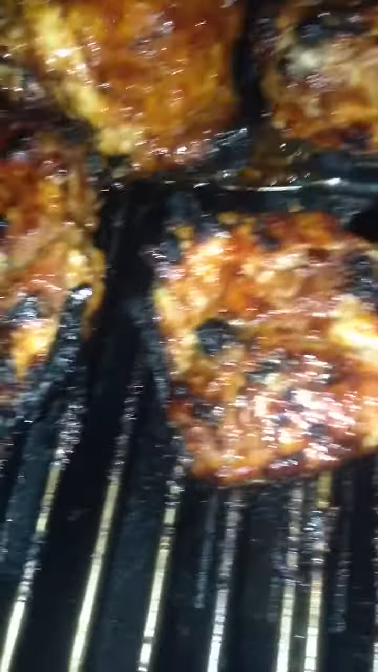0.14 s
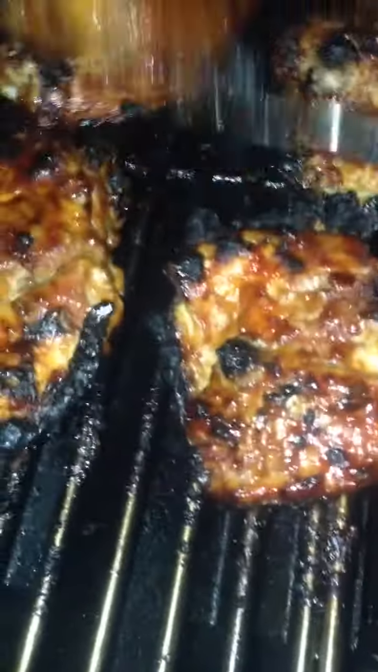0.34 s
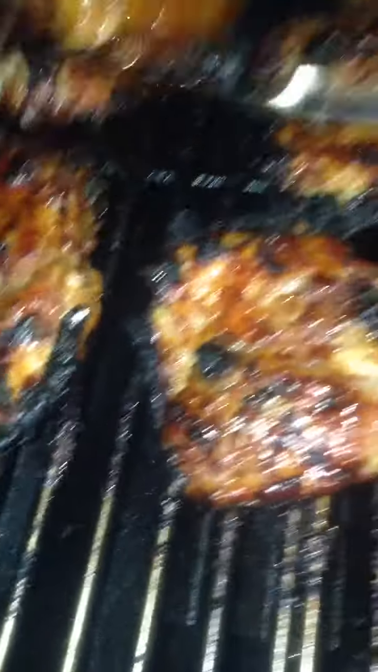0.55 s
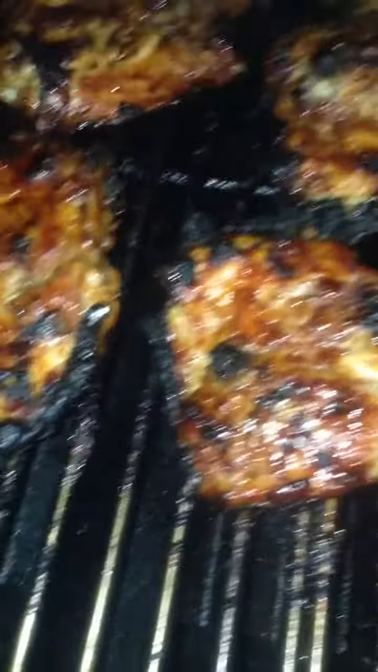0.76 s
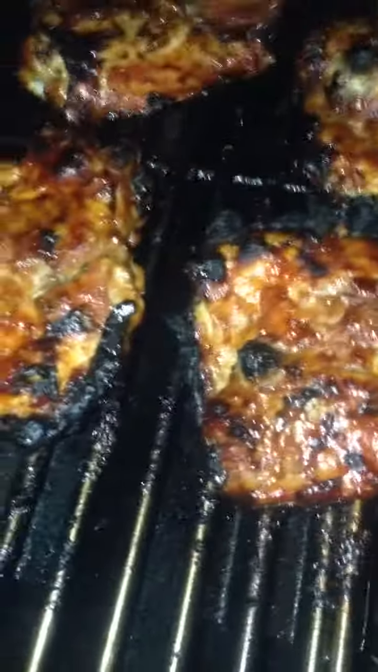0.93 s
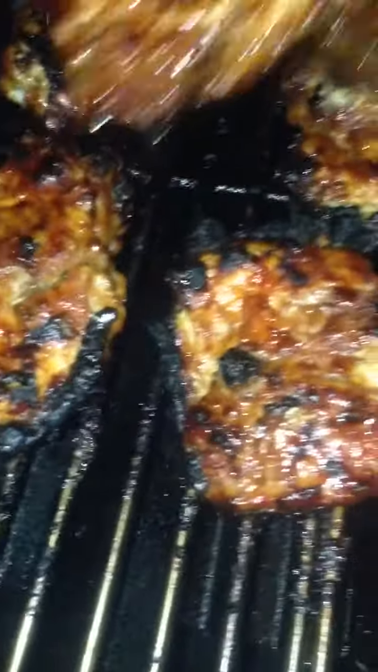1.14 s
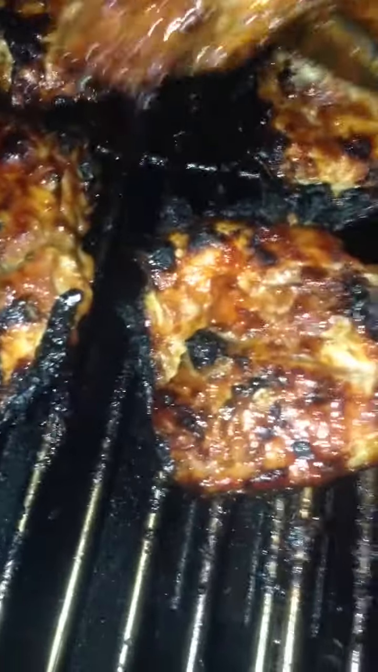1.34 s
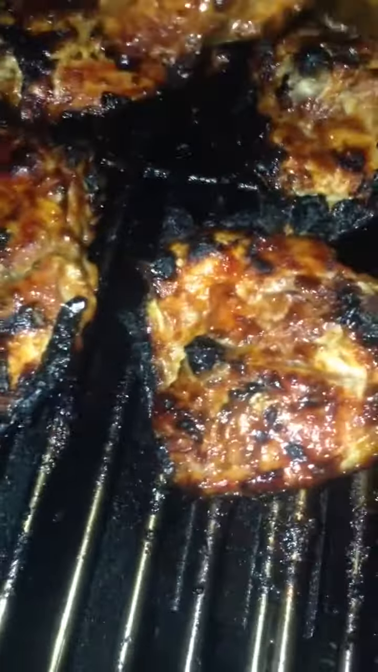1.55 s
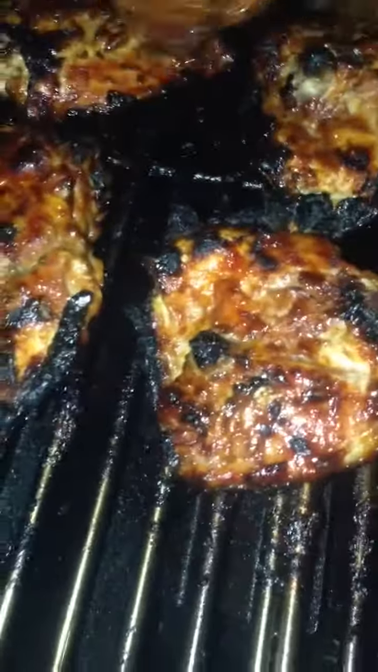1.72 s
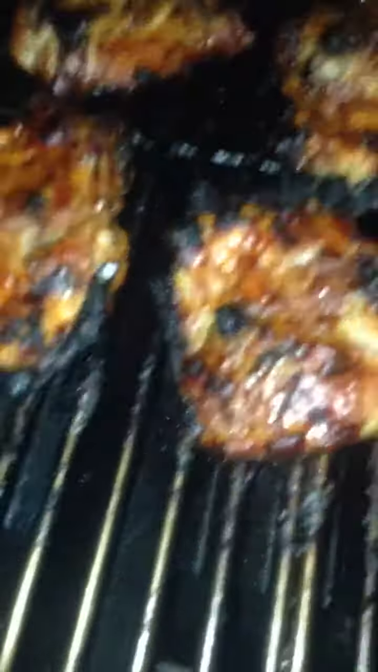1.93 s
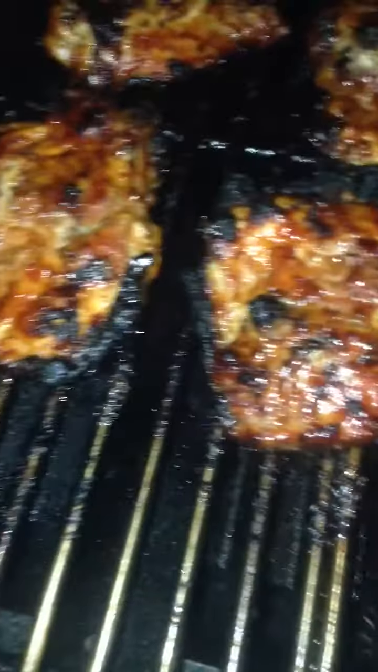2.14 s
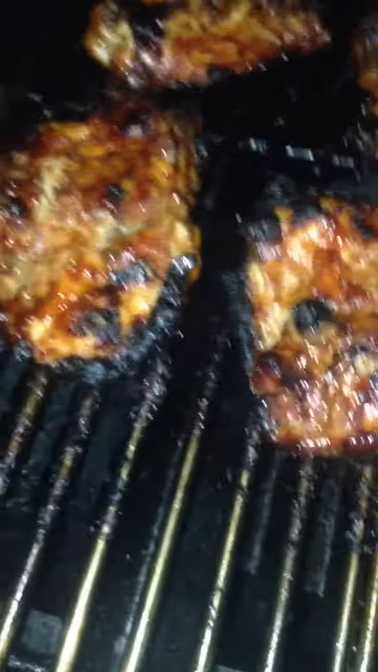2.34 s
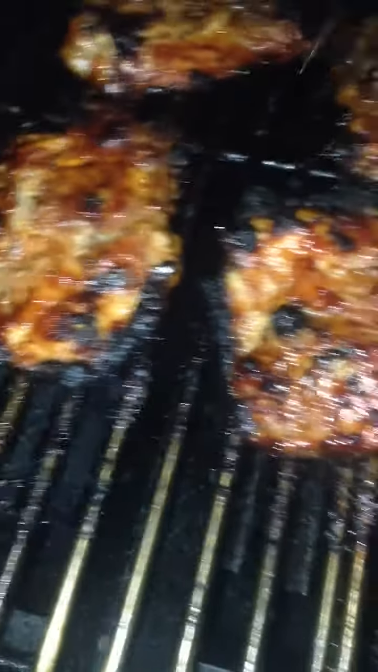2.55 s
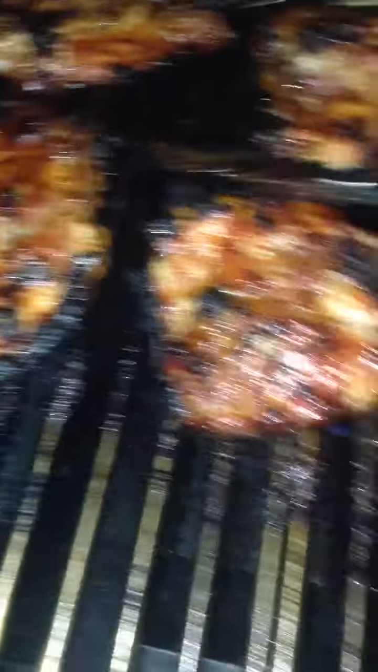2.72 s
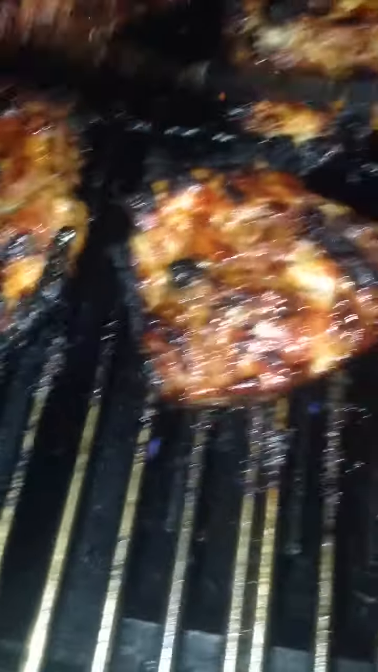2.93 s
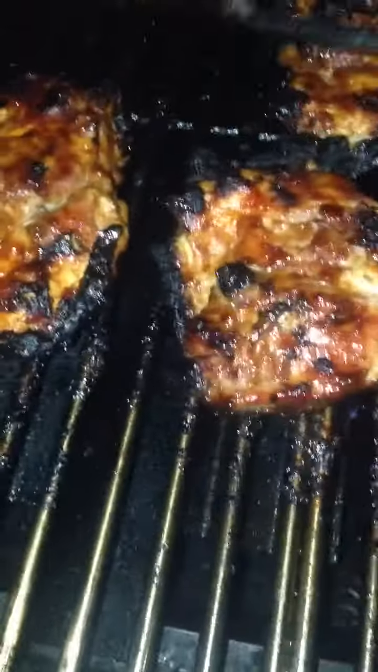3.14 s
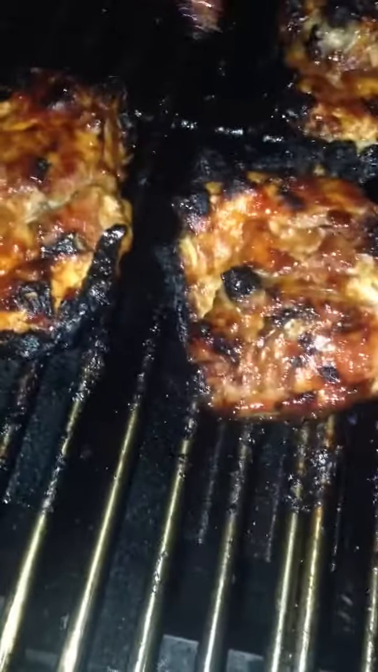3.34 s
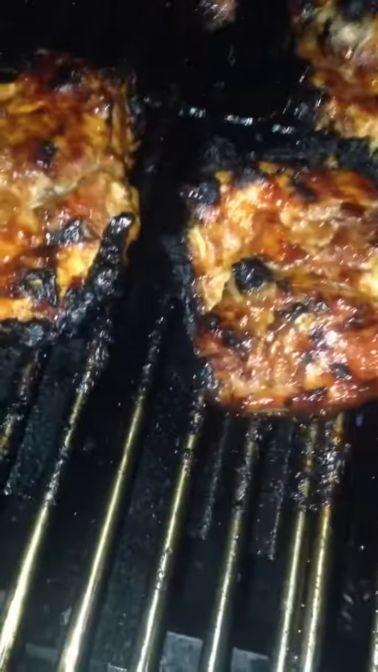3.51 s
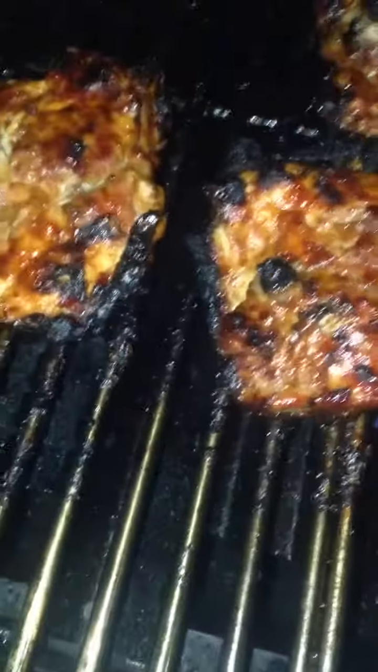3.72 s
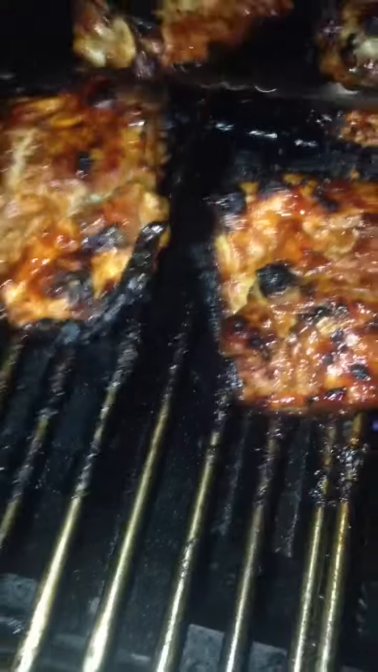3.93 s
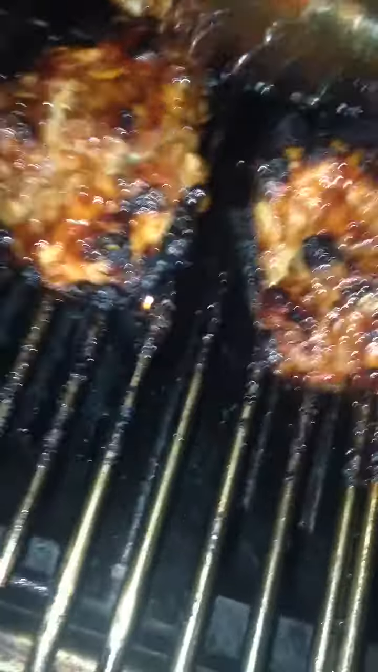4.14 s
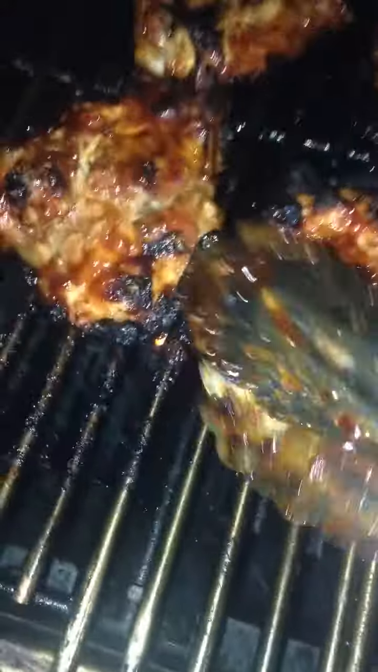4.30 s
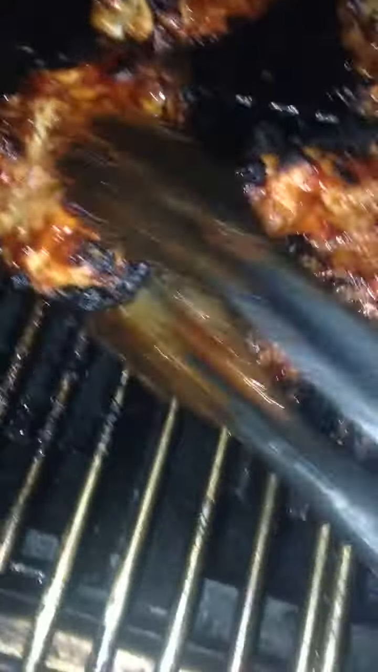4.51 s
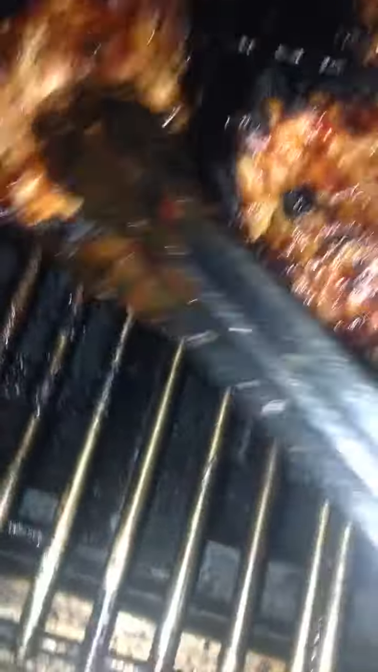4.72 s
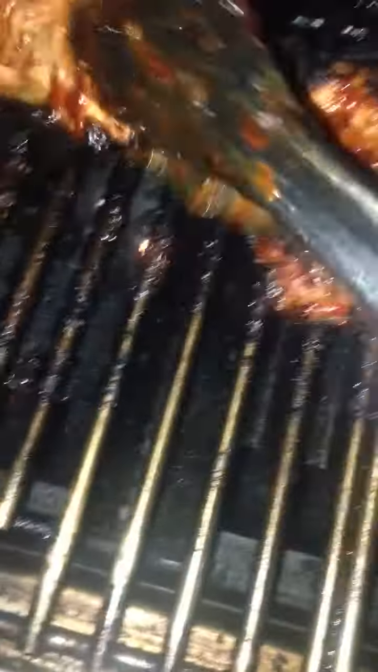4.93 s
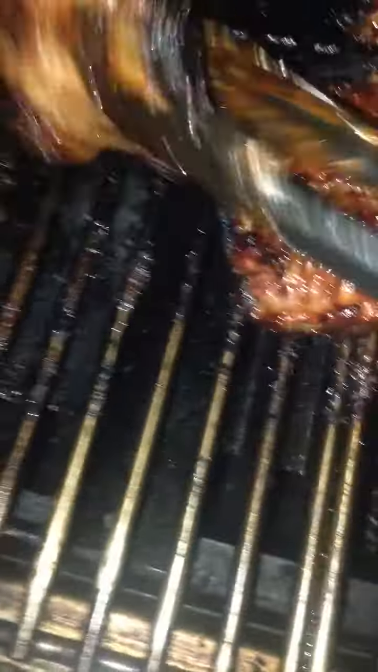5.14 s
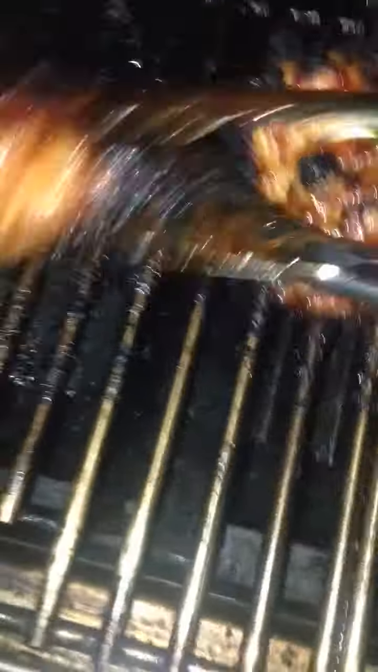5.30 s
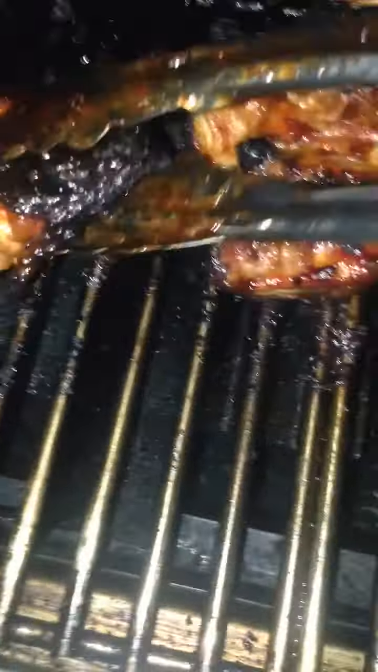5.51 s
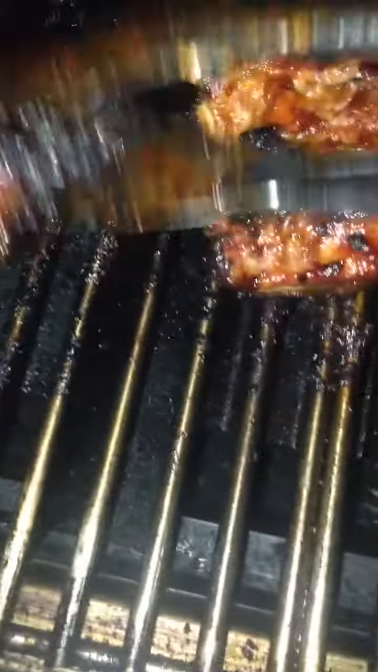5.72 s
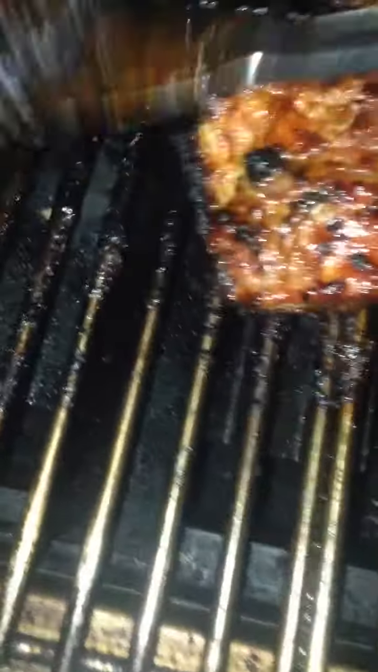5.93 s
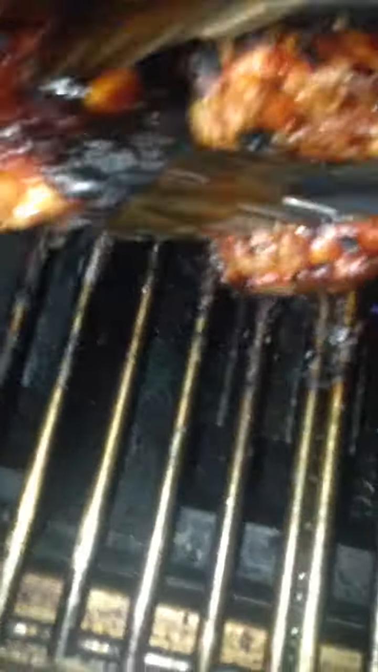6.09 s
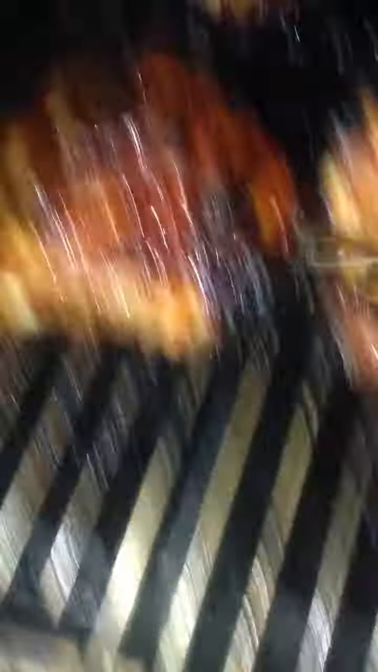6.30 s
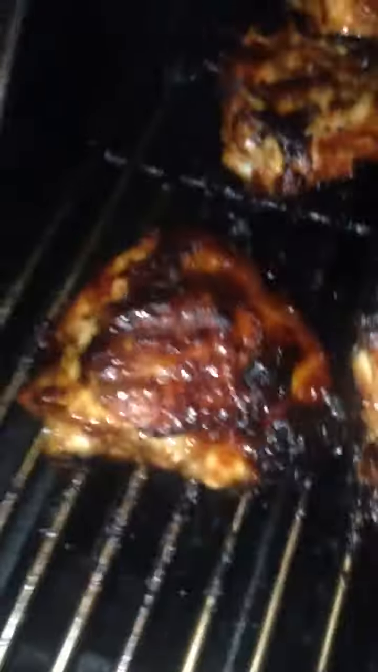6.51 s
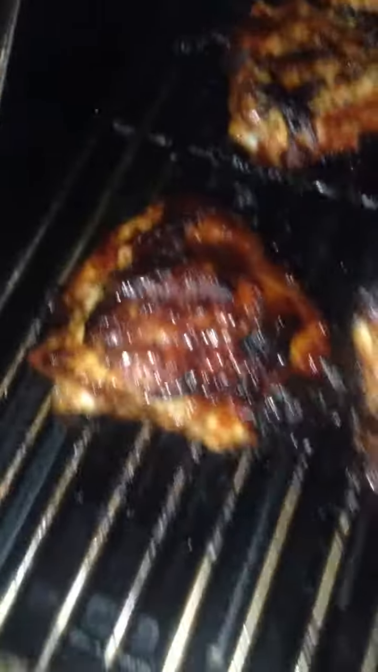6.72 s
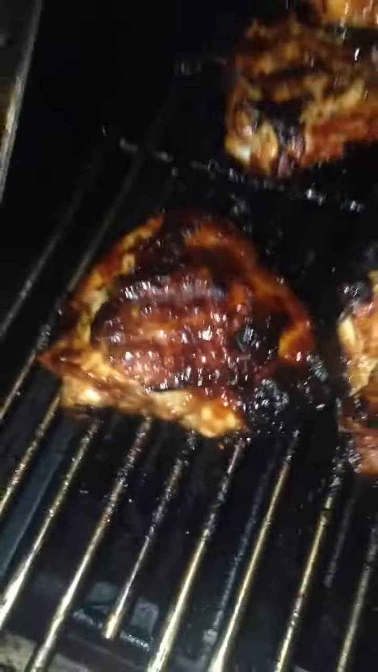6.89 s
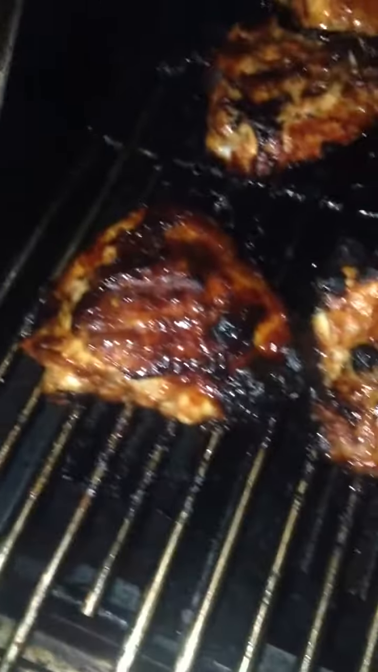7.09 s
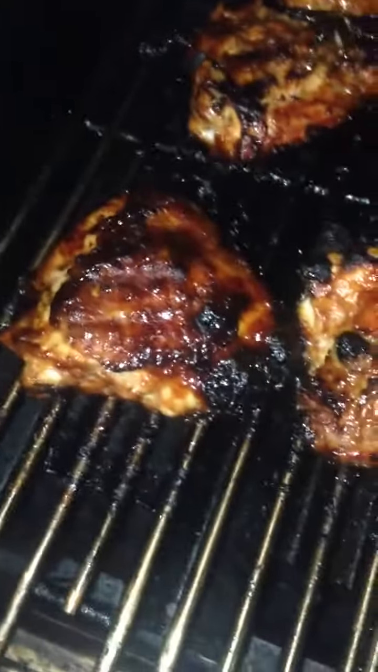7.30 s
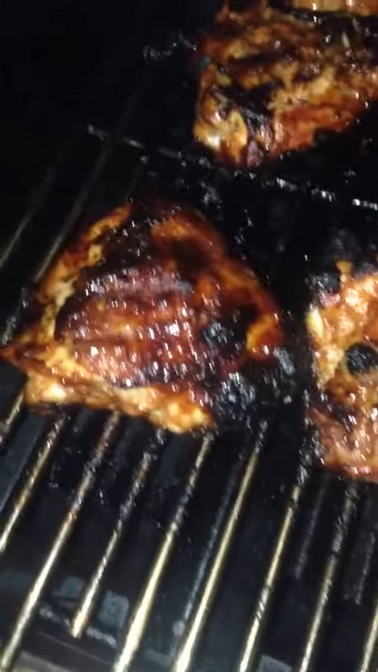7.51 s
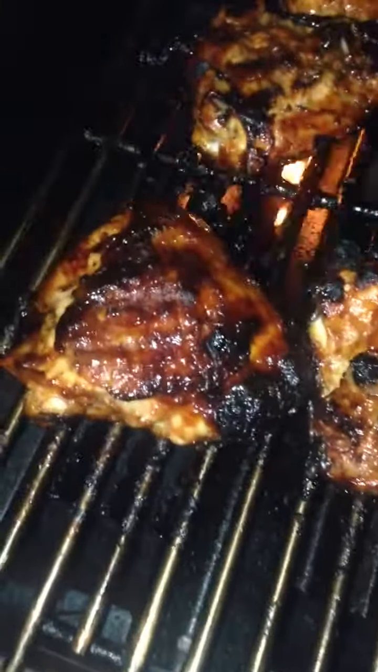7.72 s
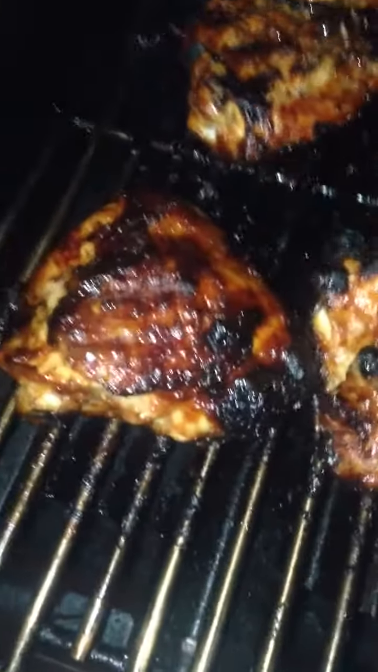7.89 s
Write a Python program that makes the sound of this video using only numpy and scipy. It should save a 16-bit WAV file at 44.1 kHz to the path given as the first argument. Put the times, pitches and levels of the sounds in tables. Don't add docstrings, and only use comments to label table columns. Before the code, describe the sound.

Sauced chicken sizzles on a hot grate, heard very close in mono by a phone with slightly limited treble. A steady steam hiss full of fine crackle opens loud and bright, with sharp pops in the first quarter second. It dips, then brightens suddenly near 0.85 s, just after a brief, rising low moan of flaring fat. From 1.3 s the sizzle slowly weakens, still peppered with pops, ticks and duller juicy plops; tongs rattle faintly near 2.9 s and soft low knocks cluster at 3.3-3.7 s. It is quietest and dullest around 4.4 s, then brightens abruptly and builds, with bumps near 5 s and frequent spits. A short swell comes at 6.4 s. After easing, hiss surges at 7.6 s with the strongest pop and fluttering low flame puffs, then settles slightly. Soft scraping and bass flame roar run underneath.

```python
import sys
import numpy as np
from scipy import signal
from scipy.io import wavfile
from scipy.ndimage import uniform_filter1d

SR = 44100
rng = np.random.default_rng(int(sys.argv[2]) if len(sys.argv) > 2 else 0)


def transcribe(signal):
    frames = np.atleast_2d(signal).T
    limited = np.clip(frames, -1, 1)
    pcm = np.round(limited * 32767).astype(np.int16)
    wavfile.write(sys.argv[1], SR, pcm)


def amplitude_ratio(level_db):
    exponent = np.asarray(level_db, float) / 20
    return 10 ** exponent


N = 350595

# (time [s], level [dB], brightness [dB])
SIZZLE_OVER_TIME = [(0.0, -34, 3.5), (0.5, -38.5, 2), (0.69, -40.5, 1), (0.79, -39, -1), (0.86, -37, 7),
                    (1.1, -37, 4.5), (1.33, -40, 0), (2.17, -43, -0.5), (3.25, -45, -2), (4.4, -48, -3),
                    (4.5, -45, 4.5), (4.92, -41.5, 1), (6.1, -42, 1), (6.38, -38, 2), (6.58, -41, 0),
                    (7.4, -41, -2), (7.63, -35.5, 3.5), (7.95, -39, 2.5)]
# (frequency [Hz], level per Hz [dB])
SIZZLE_COLOUR = [(71, -54), (120, -18), (166, -8), (229, -8.5), (397, -3), (506, -13), (645, -6.5),
                 (987, -10.5), (1210, -3), (1850, -4), (2000, -1.5), (2770, -1.5), (3330, 0), (13700, -0.5),
                 (15200, -1)]
# (centre time [s], rise [dB])
JUICE_SEETHES = [(0.3, 1), (0.59, 2.5), (0.75, 1), (1.41, 1.5), (2.0, 0.5), (2.26, 3.5), (2.4, 2),
                 (2.72, 2.5), (2.88, 2.5), (3.06, 0), (3.76, 1.5), (4.23, 3), (4.61, 2.5), (4.79, -0.5),
                 (4.92, 1.5), (5.32, 2.5), (5.96, 2.5), (6.17, 3), (6.71, 2.5), (7.01, 0)]
# (time [s], flutter level [dB], roar level [dB])
FLAME_OVER_TIME = [(0.0, -65.5, -67), (0.55, -73, -59), (1.0, -65, -56.5), (2.28, -78, -56),
                   (2.75, -65.5, -59), (3.1, -75, -56), (3.52, -66, -67), (3.74, -73, -76),
                   (4.65, -72.5, -60), (5.2, -73, -62.5), (6.1, -68.5, -63.5), (6.6, -71.5, -61),
                   (7.26, -74, -52.5), (7.95, -68, -57)]
# (frequency [Hz], width [Hz], level [dB])
GRILL_HOLLOW = [
    (160, 36, 2),
    (300, 110, -3),
    (382, 67, -0.5),
]
# (time [s], pitch [Hz], level [dB])
FLARE_MOAN = [
    (0.715, 139, -61),
    (0.76, 158.7, -54),
    (0.82, 167, -51.5),
    (0.87, 180, -61),
]
# (centre time [s], peak [dB], pitch [Hz])
SOFT_KNOCKS = [(0.021, -43, 71.5), (0.171, -52, 77.6), (1.006, -44, 427), (2.877, -44, 183),
               (2.917, -48, 147), (3.324, -54, 70), (3.401, -51, 59), (3.445, -40.5, 129), (3.482, -51, 93),
               (3.546, -50, 59), (3.589, -48, 146), (3.63, -43, 173), (3.654, -43.5, 94.5),
               (3.689, -51, 70), (4.009, -51, 111), (4.055, -55, 80), (4.108, -58, 80), (4.855, -49, 70.4),
               (4.867, -48, 157), (4.942, -55, 110), (4.977, -46, 173), (4.995, -45, 109),
               (5.024, -44, 299), (5.092, -54, 85), (6.41, -53, 65)]
# (centre time [s], peak [dB], pitch [Hz])
FLAME_PUFFS = [
    (0.239, -44, 294),
    (2.25, -49, 300),
    (5.071, -52, 390),
    (6.68, -53, 248),
    (7.643, -50, 188),
    (7.664, -46, 427),
    (7.69, -45, 178),
    (7.706, -43, 284),
    (7.725, -44, 391),
    (7.748, -45, 325),
]
# (time [s], peak [dB], centre frequency [Hz], bright part [dB])
FAT_POPS = [(0.0394, -13, 2610, -15), (0.1224, -14, 8210, -13), (0.2084, -12, 8300, -19),
            (0.616, -16, 3270, -10), (0.8687, -19, 8110, -15), (0.9792, -15, 8250, -16),
            (1.3896, -16, 4310, -25), (1.8185, -24.5, 5940, -13), (1.8617, -12.5, 6950, -25),
            (1.937, -15.5, 5890, -17), (2.0014, -20, 4910, -19), (2.38, -16.5, 6480, -14),
            (2.4498, -21.5, 7940, -11), (2.5043, -17, 7660, -18), (3.5595, -18, 7340, -20),
            (3.9817, -22, 2310, -24), (4.2497, -24, 1980, -12), (4.5989, -17.5, 7870, -14),
            (4.9095, -18, 3770, -19), (5.3063, -18.5, 8600, -10), (5.4036, -14.5, 6710, -15),
            (5.5744, -18.5, 7300, -11), (5.79, -14.5, 5970, -14), (6.0593, -16, 4100, -24),
            (6.1724, -22, 3700, -17), (6.4455, -18.5, 8730, -16), (7.576, -16, 7870, -17),
            (7.6184, -16, 5330, -13), (7.676, -9.5, 7930, -13), (7.8724, -17, 5360, -18)]
# (time [s], peak [dB], centre frequency [Hz])
FAT_TICKS = [(0.7587, -20, 4990), (0.9134, -13, 8150), (1.0284, -13, 8520), (1.066, -21, 8680),
             (1.1164, -14, 8650), (1.1687, -18, 5770), (1.3199, -26, 3640), (1.9724, -17, 3400),
             (2.0582, -24, 8110), (2.3256, -23, 2930), (2.5204, -23, 4490), (3.049, -21, 1990),
             (3.1517, -23, 7190), (3.1757, -25, 3400), (3.2989, -22, 4940), (3.3628, -21.5, 4340),
             (3.5159, -20, 5160), (3.925, -20, 5940), (4.4458, -22.5, 7870), (4.5645, -19, 4700),
             (4.6937, -22, 4870), (4.7242, -21, 3300), (4.816, -23, 6340), (4.9524, -20, 3210),
             (4.9904, -19, 7320), (5.1634, -16.5, 5510), (5.3532, -17, 7850), (5.4644, -18.5, 7050),
             (5.6456, -19, 6470), (5.9479, -19, 8340)]
# (time [s], peak [dB], centre frequency [Hz])
JUICE_PLOPS = [(6.21, -31, 600), (0.36, -22, 2790), (0.713, -24.5, 440), (0.785, -28.5, 316),
               (1.107, -23, 1470), (1.805, -28.5, 735), (1.862, -30, 1340), (2.183, -31, 651),
               (2.734, -29.5, 1300), (2.993, -30, 1360), (3.05, -28, 900), (3.83, -34, 560),
               (3.982, -24, 1210), (4.622, -20, 1970), (4.216, -26, 3000), (5.15, -25, 2120),
               (5.43, -25.5, 1940), (5.524, -29, 1500), (5.657, -28.5, 1190), (5.852, -24.5, 2310),
               (6.31, -23.5, 3800), (6.534, -26.5, 1230), (6.587, -26.5, 1340), (6.704, -24.5, 1230),
               (6.93, -25.5, 1340), (7.031, -25, 2450), (7.132, -28.5, 2300), (7.388, -23.5, 1200),
               (7.435, -25.5, 1550), (7.778, -24, 1470)]
# (centre time [s], level [dB], half length [s])
GRATE_DRAGS = [(0.263, -54, 0.059), (0.8, -50, .05), (1.25, -54, 0.044), (1.423, -53, 0.047),
               (2.05, -52, 0.034), (2.264, -53.5, 0.057), (2.95, -53, 0.081), (3.447, -57.5, 0.072),
               (4.65, -54, .04), (5.47, -57, 0.066), (6.06, -65, 0.034), (7.1, -59, 0.065)]


def evened(x):
    return x / np.sqrt(np.mean(x ** 2) + 1e-20)


def add(mix, s, sound):
    part = mix[round(s * SR):][:len(sound)]
    part += sound[:len(part)]


def resonate(x, hz, width):
    return signal.lfilter(*signal.iirpeak(hz, hz / min(width, 0.4 * SR), SR), x)


def resonate_twice(x, hz, width):
    return resonate(resonate(x, hz, width), hz, 2 * width)


def smooth_twice(x, size):
    return uniform_filter1d(uniform_filter1d(x, size), size)


def smooth_grid(grid, bins, frames):
    return uniform_filter1d(uniform_filter1d(grid, size=bins, axis=0), size=frames, axis=1)


def wander(per_s):
    return evened(smooth_twice(rng.standard_normal(N), max(int(SR / per_s), 1)))


def burst(noise, hz, sharpness, t60, snap=0.74):
    t = np.arange(len(noise)) / SR
    push = noise * amplitude_ratio(-60 * t / t60)
    push[:2] += snap * np.array([1, -0.6]) * np.sign(noise[0])
    sound = resonate_twice(push, hz, hz / sharpness)
    return sound / abs(sound).max()


def crackle(per_s, spread_db, clump_db, t60, count=28):
    chance = per_s / SR * amplitude_ratio(clump_db * wander(25))
    loudness = amplitude_ratio(spread_db * np.minimum(rng.exponential(1, N), 3.1))
    bursts = loudness * (rng.random(N) < chance)
    kind = rng.integers(0, count, N)
    out = np.zeros(N)
    pitches = 700 * np.geomspace(1, 20, count) ** rng.uniform(0.97, 1, count)
    for k, hz in enumerate(pitches):
        noise = rng.standard_normal(1024)
        bubble = evened(burst(noise, hz, 0.73, t60 * rng.uniform(0.32, 1.77), snap=2.4))
        bubble *= hz ** 0.14
        out += signal.oaconvolve(bursts * (kind == k), bubble)[:N]
    return evened(out)


def boil_db(t):
    return np.interp(t, *np.transpose(SIZZLE_OVER_TIME)[:2])


def raw_sizzle():
    hiss = rng.standard_normal(N) * amplitude_ratio(0.68 * wander(175))
    raw = amplitude_ratio(-2.0) * evened(hiss)
    raw += amplitude_ratio(-3.5) * crackle(800, spread_db=3.5, clump_db=2.0, t60=0.016)
    raw += amplitude_ratio(-15.0) * crackle(150, spread_db=1.5, clump_db=2.5, t60=0.0021, count=8)
    return raw / np.sqrt(smooth_twice(raw ** 2, 5000))


def sizzle():
    hz, t, z = signal.stft(raw_sizzle(), SR, nperseg=512, noverlap=384)
    z /= np.sqrt(uniform_filter1d((abs(z) ** 2).mean(1), size=9))[:, None]
    octave = np.log2(hz + 1)[:, None]

    half_width_s = 0.026
    seethe_db = sum(db * np.exp(-0.5 * ((t - s) / half_width_s) ** 2) for s, db in JUICE_SEETHES)
    level_db = boil_db(t) + seethe_db

    bright_db = np.interp(t, *np.transpose(SIZZLE_OVER_TIME)[::2]) - 2.0 - seethe_db
    drift = np.interp(t, np.arange(N) / SR, wander(8.4))
    body_db = 0.9 - 0.2 * (boil_db(t) + 43) - seethe_db + 1.15 * drift
    treble = np.clip((octave - 12.3) / 1.27, 0, 1)
    bass = np.clip((11.5 - octave) / 2.4, 0, 1)

    patches_db = evened(smooth_grid(rng.standard_normal(z.T.shape).T, 9, 20))
    colour_hz, colour = np.transpose(SIZZLE_COLOUR)
    colour_db = np.interp(octave, np.log2(colour_hz), colour)
    shaped = z * amplitude_ratio(colour_db + treble * bright_db + bass * body_db + patches_db)
    middle = abs(z * amplitude_ratio(colour_db))[(hz > 2500) & (hz < 7000)]
    shaped /= np.sqrt((middle ** 2).sum(0).mean())
    return amplitude_ratio(-1.0) * signal.istft(shaped * amplitude_ratio(level_db), SR, nperseg=512, noverlap=384)[1][:N]


def moan():
    s, hz, db = np.transpose(FLARE_MOAN)
    t = np.arange(s[0], s[-1], 1 / SR)
    pitch = np.interp(t, s, hz)
    late = np.linspace(0, 1, len(t))
    lower = np.sin(2 * np.pi * np.cumsum(pitch) / SR)
    upper = np.sin(2 * np.pi * np.cumsum(pitch * (1.85 + 0.52 * late ** 2)) / SR)
    tone = lower + 2.5 * late ** 2.1 * upper
    return amplitude_ratio(np.interp(t, s, db) + 6.5) * tone * signal.windows.tukey(len(t), 0.2)


def flame():
    s, flutter_db, roar_db = np.transpose(FLAME_OVER_TIME)
    t = np.arange(N) / SR
    gusts = np.diff(rng.standard_normal(N + 1))
    flutter = resonate(resonate(gusts, 46, 62), 47, 83) * amplitude_ratio(3.0 * wander(25))
    air = rng.standard_normal(N)
    roar = sum(amplitude_ratio(db) * resonate_twice(air, hz, width) for hz, width, db in GRILL_HOLLOW)
    roar = roar * amplitude_ratio(2.1 * wander(32))
    out = amplitude_ratio(np.interp(t, s, flutter_db) + 3.2) * evened(flutter)
    out += amplitude_ratio(np.interp(t, s, roar_db) - 4.5) * evened(roar)
    add(out, FLARE_MOAN[0][0], moan())
    return out


def knocks():
    out = np.zeros(N)
    t = np.arange(-800, 800) / SR
    for rows, cycles in ((SOFT_KNOCKS, 0.5), (FLAME_PUFFS, 1.4)):
        for (s, db, hz), phase in zip(rows, rng.random(len(rows))):
            swell = np.exp(-0.5 * (t * hz / cycles) ** 2)
            wave = np.sin(2 * np.pi * (hz * t + phase))
            add(out, s + t[0], amplitude_ratio(db + 5.0) * swell * wave)
    return out


def small_pops(count=130):
    when, size, pitch, top = rng.random((count, 4)).T
    s = when * N / SR
    peak_db = boil_db(s) + 15.5 + 4.5 * (2 * size - 1)
    return np.transpose([s, peak_db, 1800 * 4.0 ** pitch, -26 + 14 * top])


def fat_pop(hz, top_db, noise):
    crack = 0.7 * burst(noise[0], hz, 2.2, 0.031, snap=5.4)
    crack += 0.94 * burst(noise[1], 3760, 0.51, 0.034, snap=4.6)
    tick = amplitude_ratio(top_db + 15.0) * burst(noise[3], 12100, 3.0, 0.006, snap=1.8)
    spit_db = -9 - 4.5 * np.log2(hz / 4000)
    spit = amplitude_ratio(spit_db) * burst(noise[2], 950, 1.17, 0.021, snap=1.2)
    return crack / abs(crack).max() + spit + tick


def tongs_rattle(out):
    rattle = rng.standard_normal((3, 6000))
    add(out, 2.862, amplitude_ratio(-28) * burst(rattle[0], 4500, 2.5, 0.1, snap=0))
    add(out, 2.862, amplitude_ratio(-33.5) * burst(rattle[1], 1650, 12.0, 0.13, snap=0))
    add(out, 4.626, amplitude_ratio(-30) * burst(rattle[2], 620, 1.6, 0.2, snap=0))


def through_grill(x):
    hz, db = np.transpose(SIZZLE_COLOUR)
    grid = np.linspace(0, SR / 2, num=1024)
    power = amplitude_ratio(2 * np.interp(np.log(grid + 1), np.log(hz), db))
    path = signal.minimum_phase(signal.firwin2(2047, grid, power, fs=SR))
    return signal.oaconvolve(x, path)[:N]


def pops():
    out = np.zeros(N)
    ticks = [(s, db, hz, -19 + 3 * np.log2(hz / 4000)) for s, db, hz in FAT_TICKS]
    rows = np.vstack([FAT_POPS, ticks, small_pops()])
    delay_s = 0.0009
    for (s, db, hz, top_db), noise in zip(rows, rng.standard_normal((len(rows), 4, 1500))):
        add(out, s + delay_s, amplitude_ratio(db - 5.5) * fat_pop(hz, top_db, noise))
    for s, db, hz in JUICE_PLOPS:
        add(out, s, amplitude_ratio(db + 1.0) * burst(rng.standard_normal(3000), hz, 1.25, 0.025, snap=6.4))
    tongs_rattle(out)
    return through_grill(out)


def drags():
    t = np.arange(0, N, 64) / SR
    swell = sum(amplitude_ratio(db) * np.exp(-0.5 * ((t - s) / half) ** 2) for s, db, half in GRATE_DRAGS)
    rub = resonate_twice(rng.standard_normal(N), 380, 660)
    lumpy = evened(rub * amplitude_ratio(5.5 * wander(62)))
    return lumpy * np.interp(np.arange(N) / SR, t, swell)


def scene():
    mono = sizzle() + flame() + knocks() + pops() + drags()
    return np.tile(mono, (2, 1))


def band_limit(x, edge_hz):
    return signal.oaconvolve(x, signal.firwin(2001, edge_hz, window=("kaiser", 7), fs=SR), "same")


def low_pass(x):
    return signal.sosfilt(signal.butter(12, 16550, fs=SR, output="sos"), x)


def record(dry):
    mono = dry[0]
    limited = band_limit(mono, 15310)
    wider = band_limit(mono, 15820)
    power = mono ** 2
    sudden = uniform_filter1d(power, size=128) > 5.5 * uniform_filter1d(power, size=4096)
    opened = np.clip(uniform_filter1d(1.0 * sudden, size=1400) * 100, 0, 1)
    heard = limited + amplitude_ratio(-12.0) * opened * (wider - limited)

    hz, t, z = signal.stft(heard, SR, nperseg=2048)
    band = smooth_grid(abs(z) ** 2, 5, 2)
    around = smooth_grid(band, 61, 5)
    weak = band < around * np.interp(hz, [5000, 14000], [0.12, 0.3])[:, None]
    near_weak = uniform_filter1d(1.0 * weak, size=5, axis=0)
    in_treble = (abs(hz - 10100) < 5100)[:, None]
    z[near_weak * in_treble > 0] *= 0.1
    kept = signal.istft(z, SR, nperseg=2048)[1][:N]
    return low_pass(np.tile(kept, (2, 1)))


dry = scene()
out = record(dry)
transcribe(out)
```